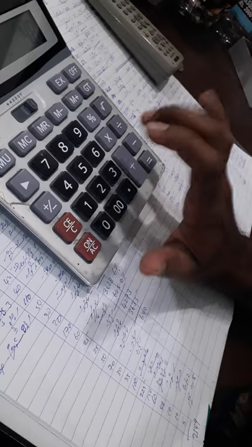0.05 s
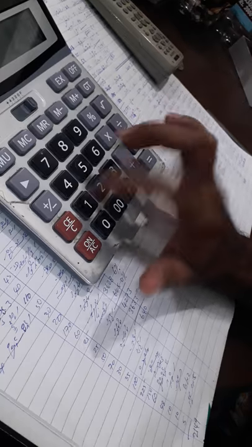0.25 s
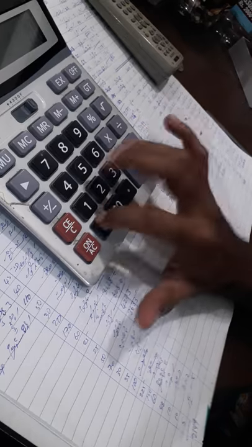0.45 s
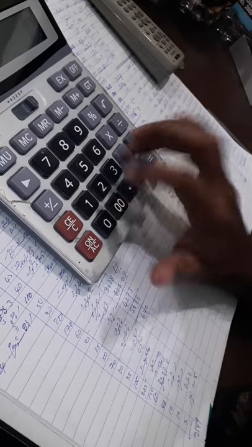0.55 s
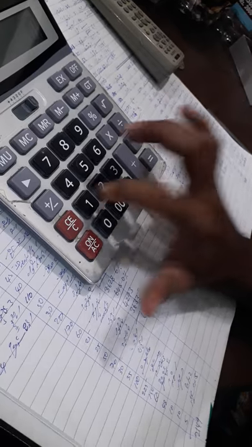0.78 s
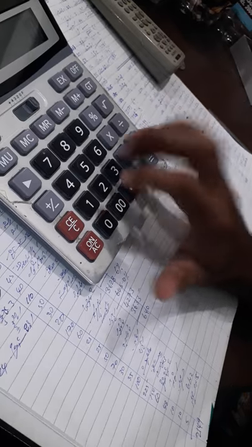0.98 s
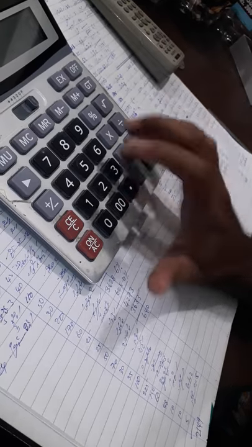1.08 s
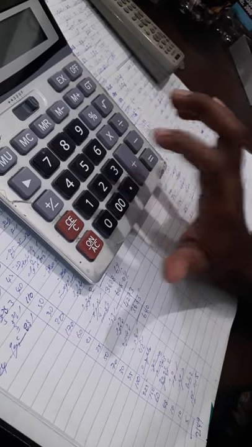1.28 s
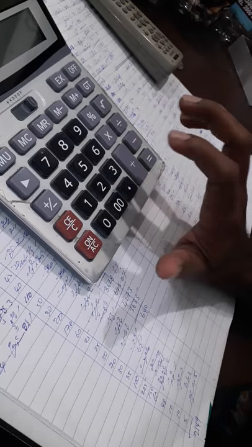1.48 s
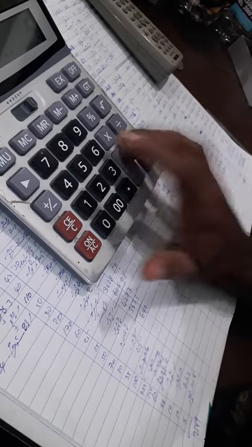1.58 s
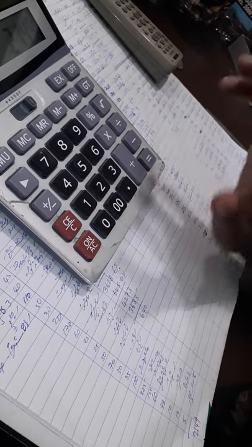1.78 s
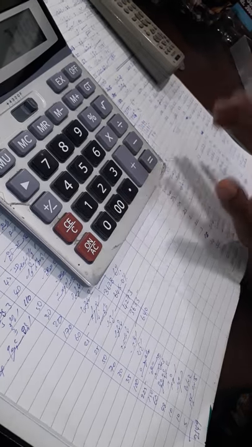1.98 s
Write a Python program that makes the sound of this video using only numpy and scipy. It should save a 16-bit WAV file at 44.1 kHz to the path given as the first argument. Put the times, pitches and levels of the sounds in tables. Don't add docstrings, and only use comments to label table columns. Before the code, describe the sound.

Close stereo phone pickup of fast calculator typing: dry bright clicks with small thumps of the case on a paper-covered desk, a pause, two last clacks, and a faint humming, fluttering fan behind in a room.

```python
import sys
import numpy as np
from scipy import signal
from scipy.fft import rfft, irfft
from scipy.io import wavfile
from scipy.ndimage import uniform_filter1d

SR = 44100
rng = np.random.default_rng(int(sys.argv[2]) if len(sys.argv) > 2 else 0)


def volts(x):
    e = np.asarray(x, float) / 20
    return 10 ** e


def transcribe(u):
    v = np.clip(np.atleast_2d(u).T, -1, 1)
    q = np.round(v * 32767).astype(np.int16)
    wavfile.write(sys.argv[1], SR, q)


N = 90404

TICK_DB = 11

# start in seconds, cap level in dB, tick level in dB, cap pitch in Hz,
# contact time in seconds.
KEYS = [(0.1402, -18, -29, 2175, 0.00066), (0.2166, -16, -25.5, 2640, 0.00038),
        (0.3148, -20, -32, 2366, 0.00219), (.374, -39, -27, 2075, .0012),
        (0.4536, -30, -33.5, 2036, 0.00089), (0.459, -22.5, -31, 2359, 0.00038),
        (0.491, -28, -50, 1984, 0.00042), (.512, -28, -45, 2300, 0.00081), (.527, -23, -25, 2380, 0.00076),
        (0.603, -12.5, -27, 2360, 0.00041), (0.6803, -11, -18, 2520, 0.00071),
        (0.744, -22.5, -34, 2465, 0.0017), (0.7974, -14.5, -25, 2350, 0.00053),
        (0.8794, -18.5, -21, 2360, 0.00065), (0.9162, -26.5, -44, 2427, 0.00097),
        (0.9508, -19.5, -25, 2330, 0.00096), (1.031, -13, -20.5, 2290, 0.0005),
        (1.0655, -29, -44.5, 2020, .0006), (1.105, -20, -31, 2253, 0.00051),
        (1.1745, -19, -24.5, 2450, 0.00069), (1.2284, -27, -21.5, 2460, 0.00125),
        (1.6139, -6, -18.5, 2550, 0.00039), (1.6729, -11, -19, 2540, 0.00044)]
# ratio to the cap pitch, level in dB, 60 dB decay time in seconds.
CAP_MODES = [(1.0, 5.5, 0.0082), (1.09, -16.5, 0.0089)]
BOUNCE_S, BOUNCE_DB = 0.0038, -12
CAP_DB = -1.5
SWELL_EARLY = 0.6
SCRAPE_EXTRA_S = 0.00069


def presses(body, ticks):
    for start_s, cap_db, tick_db, hz, contact_s in KEYS:
        grit = rng.standard_normal((3, 700))
        for late_s, less_db in ((-SWELL_EARLY * contact_s, 0), (BOUNCE_S, BOUNCE_DB)):
            add(body, start_s + late_s, rung(CAP_MODES, hz, contact_s, cap_db + CAP_DB + less_db))
            tick = scrape(grit, SCRAPE_EXTRA_S + contact_s, tick_db + TICK_DB + less_db)
            add(ticks, start_s + late_s, tick)


# start in seconds, level in dB, length in seconds.
TOUCHES = [(0.147, -52, 0.0048), (0.213, -51, 0.0014), (0.311, -35, 0.0043), (0.377, -34, 0.0038),
           (0.6, -38, 0.00163), (0.879, -29.5, 0.0039), (0.936, -35.5, 0.0041), (0.944, -50, 0.00144),
           (1.029, -35, 0.0014), (1.164, -49, 0.0044), (1.171, -37, 0.00298), (1.217, -36, 0.00533),
           (1.6106, -35, 0.0055), (1.633, -45, 0.006), (1.646, -38, 0.0061)]
TOUCH_CAP_HZ, TOUCH_CAP_DB = 2113, 5


def touches(body, ticks):
    for start_s, db, length_s in TOUCHES:
        grit = rng.standard_normal((3, 700))
        add(ticks, start_s, scrape(grit, length_s / 2, db + TICK_DB))
        add(body, start_s, rung(CAP_MODES, TOUCH_CAP_HZ, length_s / 2, db + TOUCH_CAP_DB))


# start in seconds, case level in dB, clack level in dB,
# case pitch ratio.
THUMPS = [(.1415, -19.5, -11.5, 0.96), (.219, -38, -29, 1.2), (.318, -31.5, -47.5, 0.87),
          (.379, -38, -25.5, 1.1), (.461, -30.5, -47, 0.91), (.491, -39, -31, 1.2),
          (.531, -35.5, -32, 1.33), (.603, -19, -16.5, 0.99), (.684, -23.5, -21.5, 0.881),
          (.748, -27, -25, 0.92), (.800, -34, -43, 0.94), (.885, -30.5, -49, 0.86), (.953, -34.5, -25, .9),
          (1.032, -17, -17, 1.02), (1.109, -33, -44, 1), (1.176, -24, -49, 1.043), (1.229, -29, -52, 1.06),
          (1.6152, -17, -23, 1.03), (1.677, -32, -57, 1.1)]
# frequency in Hz, level in dB, 60 dB decay time in seconds.
CASE_MODES = [(614, -6.5, 0.12), (796.4, 11, 0.032), (919, -2, 0.034)]
CASE_CONTACT_S = 0.00079
CLACK_EARLY_S, CLACK_DB = 0.001006, -5


def thumps(body):
    for start_s, case_db, clack_db, ratio in THUMPS:
        thump = rung(CASE_MODES, ratio, CASE_CONTACT_S, case_db, rough=0, length=64)
        add(body, start_s - CASE_CONTACT_S, thump)
        add(body, start_s - CLACK_EARLY_S, clack(clack_db + CLACK_DB))


# frequency in Hz, level in dB, 60 dB decay time in seconds.
CLACK_MODES = [(1110, -23, 0.016), (1450, -17, 0.026), (1750, 38, 0.026)]
SCATTER_DB, DETUNE = 2.5, 0.01


def clack(db):
    t = np.arange(2048) / SR
    ring = np.zeros(len(t))
    for hz, mode_db, t60_s in CLACK_MODES:
        gain = volts(mode_db + SCATTER_DB * rng.standard_normal())
        pitch = hz * 0.89 * (1 + DETUNE * rng.standard_normal())
        ring += gain * decay(t, t60_s) * np.sin(2 * np.pi * pitch * t)
    push = contact(np.ones(64), 0.0001)
    return peak(signal.fftconvolve(ring, push)[:len(t)], db)


# frequency in Hz, density in dB per Hz.
TICK_SPECTRUM = [(1500, -34), (3800, 2), (4900, -2.5), (5700, 1), (7000, -2), (8600, 5), (11000, -2),
                 (15500, -12.5)]


def keys():
    body, ticks = np.zeros(N + SR), np.zeros((2, N + SR))
    presses(body, ticks)
    touches(body, ticks)
    thumps(body)
    body = signal.sosfilt(signal.butter(4, 520, "high", fs=SR, output="sos"), body[:N])
    return body + irfft(rfft(ticks[:, :N]) * volts(curve(TICK_SPECTRUM)), N)


# start in seconds, low mode level in dB,
# middle mode level in dB, middle mode frequency in Hz, high mode level in dB.
PLATE = [(0.1398, -20, -18.5, 2870, -27.5), (0.2174, -20.5, -24, 3000, -30),
         (0.3158, -22, -20.5, 2913, -34), (.374, -30, -28, 2800, -40), (0.4547, -22.5, -30, 2820, -48.5),
         (.527, -26, -26.5, 2850, -39), (.602, -20, -20.5, 2933, -30), (0.6803, -21.5, -17.5, 3066, -18.5),
         (0.743, -22.5, -34, 2900, -40), (0.7968, -21, -29, 2770, -45), (.8797, -18.5, -27, 2830, -33.5),
         (0.9501, -23, -23.5, 2700, -42), (1.031, -12, -24.5, 2820, -24), (1.105, -29, -34.5, 2770, -47.5),
         (1.1739, -15.5, -13.5, 2920, -30.5), (1.2284, -25.5, -21.5, 2880, -35),
         (1.6140, -17.5, -9.5, 3250, -16.5), (1.6735, -25.5, -23, 3050, -43.5)]
PLATE_CONTACT_S = 0.00029
PLATE_LOW_HZ, PLATE_LOW_T60_S = 2030, 0.014
PLATE_MID_T60_S = 0.0072
PLATE_HIGH_HZ, PLATE_HIGH_T60_S = 3800, 0.009
# start in seconds, frequency in Hz, level in dB.
PINGS = [(0.139, 1604, -24), (0.217, 3244, -29), (.329, 1880, -29), (.49, 1940, -27.5), (0.603, 1527, -19),
         (0.679, 4630, -32), (.88, 5630, -22), (.952, 5720, -28), (0.956, 1400, -30), (1.031, 1526, -19),
         (1.033, 3280, -27), (1.106, 4630, -42), (1.167, 3000, -31), (1.175, 5180, -20.5),
         (1.182, 2000, -31), (1.187, 1980, -27), (1.2315, 2170, -26.5), (1.6142, 1510, -15),
         (1.615, 4775, -32), (1.617, 3990, -26), (1.624, 1346, -28), (1.626, 2383, -29), (1.672, 5300, -25),
         (1.679, 2120, -28), (.143, 2230, -16.5), (.314, 2380, -25), (.8826, 2410, -16), (.9545, 2330, -20),
         (1.111, 2260, -34), (1.621, 2530, -24), (1.65, 2500, -36)]
PING_T60_S = 0.018


def plate():
    out = np.zeros(N + SR)
    for start_s, low_db, mid_db, mid_hz, high_db in PLATE:
        modes = (
            (PLATE_LOW_HZ, low_db, PLATE_LOW_T60_S),
            (mid_hz, mid_db, PLATE_MID_T60_S),
            (PLATE_HIGH_HZ, high_db, PLATE_HIGH_T60_S),
        )
        for hz, db, t60_s in modes:
            add(out, start_s, rung([(hz, 0, t60_s)], 0.943, PLATE_CONTACT_S, db))
    for start_s, hz, db in PINGS:
        add(out, start_s, rung([(hz, 0, PING_T60_S)], 0.95, PLATE_CONTACT_S, db))
    return out[:N]


PUSH_ROUGH, PHASE_SCATTER = 1, 0.12


def rung(modes, scale, contact_s, db, rough=PUSH_ROUGH, length=684):
    t = np.arange(2048) / SR
    push = contact(1 + rough * rng.standard_normal(length), contact_s)
    ring = np.zeros(len(t))
    for hz, mode_db, t60_s in modes:
        swell = signal.fftconvolve(decay(t, t60_s), push)[:len(t)]
        cycles = hz * scale * (t - contact_s) + PHASE_SCATTER * rng.standard_normal()
        ring += volts(mode_db) * swell * np.cos(2 * np.pi * cycles)
    return peak(ring, db)


GRIT = 1.5
TICK_LIKENESS = 0.28


def scrape(chance, contact_s, db):
    grit = np.sign(chance) * np.abs(chance) ** GRIT
    pair = TICK_LIKENESS * grit[0] + (1 - TICK_LIKENESS) * grit[1:]
    return peak(contact(pair, contact_s), db)


def contact(noise, contact_s):
    t = np.arange(noise.shape[-1]) / SR / np.clip(contact_s, 1e-4, 0.004)
    return noise * t ** 2 * np.exp(-2 * t)


def decay(t, t60_s):
    return np.exp(-np.log(1000) * t / t60_s)


# frequency in Hz, left minus right level in dB.
PORTS = [(300, 14), (800, 2.5), (1500, 3), (2400, -11), (3500, -5), (5500, -3.5), (8500, -0.5),
         (12500, -5.5)]
# frequency in Hz, lag of the right port in radians.
PORT_LAG = [(500, 0.091), (1000, 0.2), (1600, 1.76), (2400, 1.94), (3500, 6.61), (6000, 10.8),
            (10000, 16.94), (16000, 23.6)]


def ports(x):
    half_db = curve(PORTS) / 2
    left = volts(half_db)
    right = volts(-half_db) * np.exp(-1j * curve(PORT_LAG))
    return irfft(rfft(x * np.ones((2, 1))) * np.array([left, right]), N)


DESK_DB, DESK_T60_S, DESK_TOP_HZ = -12, 0.071, 4840


def desk(x):
    t = np.arange(SR // 8) / SR
    tail = rng.standard_normal((2, len(t))) * decay(t, DESK_T60_S)
    tail /= np.sqrt((tail ** 2).sum(axis=1, keepdims=True))
    tail = signal.lfilter(*signal.butter(1, DESK_TOP_HZ, fs=SR), tail)
    return signal.fftconvolve(x, tail, axes=1)[:, :N] * volts(DESK_DB)


# time in seconds, level in dB.
KNOCKS = [(.023, -10), (.067, -15), (.111, -12), (.155, -16), (.199, 7.5), (.243, -10), (.287, -22),
          (.418, 4), (.506, 1.5), (.550, -8), (.594, -28.5), (.638, 5.5), (.726, 5), (.991, -3), (1.125, 3),
          (1.300, 1.5), (1.386, 3.5), (1.473, 2), (1.519, -0.5), (1.561, 3), (1.737, -5), (1.781, 2),
          (1.825, 3), (1.869, 1), (1.913, -1.5), (2.000, 1.5)]
# frequency in Hz, width in Hz, level in dB.
CAGE = [(2070, 290, -10), (2300, 460, -2.5), (2887, 650, 0), (3080, 550, -10.5), (3497, 170, -11)]
CAGE_RING = 0.15
TURN_HZ, FIRST_TURN_S = 22.76, 0.0233
RATTLE_DB, RATTLE_RISE_S, RATTLE_FALL_S = -43.5, 0.001, 0.022
RATTLE_SCATTER_DB = 1.5
WHINE_HZ, WHINE_WIDTH_HZ, WHINE_DB, WHINE_STEADY = 1927.2, 51, -49.5, 1.56


def rattle():
    turns = (np.arange(N) / SR - FIRST_TURN_S) * TURN_HZ + 1
    size_db = RATTLE_SCATTER_DB * rng.standard_normal(60)
    for time_s, db in KNOCKS:
        size_db[int(round((time_s - FIRST_TURN_S) * TURN_HZ + 1))] = db
    since_s = turns % 1 / TURN_HZ
    shake = (1 - np.exp(-since_s / RATTLE_RISE_S)) * np.exp(-since_s / RATTLE_FALL_S)
    shake = shake * volts(size_db[turns.astype(int)])

    noise = rng.standard_normal((2, len(CAGE), N)) * (shake + CAGE_RING)
    noise[1] = 0.27 * noise[0] + 0.96 * noise[1]
    cage = np.zeros((2, N))
    for k, (hz, width_hz, db) in enumerate(CAGE):
        ring = band(band(noise[:, k], hz, width_hz), hz, 2 * width_hz)
        cage += volts(db) * np.sqrt(200 / width_hz) * ring

    whine = rng.standard_normal(N) * (shake + WHINE_STEADY)
    whine = band(band(whine, WHINE_HZ, WHINE_WIDTH_HZ), WHINE_HZ, 2 * WHINE_WIDTH_HZ)
    return level(ports(cage), RATTLE_DB) + level(ports(whine), WHINE_DB)


# centre in seconds, length in seconds, level in dB, frequency in Hz.
PUFFS = [(.01, 0.0477, -39.5, 81), (0.116, 0.159, -40, 100), (0.149, 0.0152, -30, 102.8),
         (0.224, 0.015, -30, 94.2), (0.274, .03, -37, 70), (0.324, 0.052, -56, 60.4),
         (.47, 0.029, -40, 101), (0.89, 0.013, -52, 114), (1.092, 0.028, -40.5, 108),
         (1.427, 0.096, -42.5, 120), (1.473, 0.013, -31.5, 93.3), (1.56, 0.22, -41, 99.16),
         (1.651, 0.0183, -32.5, 110), (1.689, 0.0075, -25, 105), (1.724, 0.019, -30, 79.6),
         (1.778, 0.03, -41.5, 79), (0.097, 0.029, -46.5, 62.2), (.255, 0.073, -41, 61),
         (1.18, 0.0216, -39, 68.2), (1.978, 0.0485, -45.5, 79.3)]
PUFF_LEFT_DB, PUFF_RIGHT_DB = 6.5, -10
PUFF_WOBBLE = 0.15


def puffs():
    t = np.arange(N) / SR
    wavering_s = np.cumsum(1 + PUFF_WOBBLE * np.array([walk(60), walk(77)]), axis=1) / SR
    low = np.zeros((2, N))
    for centre_s, length_s, db, hz in PUFFS:
        swell = np.exp(-((t - centre_s) / length_s * 2) ** 2)
        low += volts(db) * swell * np.sin(2 * np.pi * hz * wavering_s)
    return low * volts(np.array([[PUFF_LEFT_DB], [PUFF_RIGHT_DB]]))


# frequency in Hz, density in dB per Hz.
AIR_LEFT = [(30, -1.5), (100, -0.5), (300, -6.5), (800, -10.5), (3300, -18.5), (5500, -34), (8600, -31),
            (15000, -46)]
AIR_RIGHT = [(30, -46), (100, -2.5), (300, -5.5), (800, -10.5), (3000, -13), (5500, -29), (9800, -24.5),
             (15000, -44)]
# frequency in Hz, likeness from 0 to 1.
LIKENESS = [(60, 0.78), (300, 0.89), (800, 0.38), (2000, 0), (6000, 0)]
AIR_DB, FLICKER_DB = -41.5, 1
HUM_HZ, HUM_WIDTH_HZ, HUM_DB = 97.9, 23.4, -52


def air():
    like = np.clip(curve(LIKENESS), 0, 1)
    shared, left, right = (flicker() for _ in range(3))
    pair = []
    for own, spectrum in ((left, AIR_LEFT), (right, AIR_RIGHT)):
        mixed = np.sqrt(like) * shared + np.sqrt(1 - like) * own
        pair.append(irfft(mixed * volts(curve(spectrum)), N))
    hum = rng.standard_normal(N)
    for _ in range(2):
        hum = band(hum, HUM_HZ, HUM_WIDTH_HZ)
    return level(np.array(pair), AIR_DB) + level(hum, HUM_DB)


def flicker():
    return rfft(rng.standard_normal(N) * volts(FLICKER_DB * walk(8.61)))


def walk(rate_hz):
    k = int(SR / rate_hz)
    steps = np.repeat(rng.standard_normal(N // k + 1), k)
    return 1.3 * uniform_filter1d(uniform_filter1d(steps, k), k)[:N]


def band(x, hz, width_hz):
    return signal.lfilter(*signal.iirpeak(hz, hz / width_hz, SR), x)


def curve(table):
    bins_hz = np.maximum(np.arange(N // 2 + 1) * SR / N, 1)
    hz, value = np.array(table).T
    return np.interp(np.log(bins_hz), np.log(hz), value)


def level(x, db):
    return x * volts(db) / np.sqrt(np.mean(x ** 2))


def peak(y, db):
    return y * volts(db) / np.abs(y).max()


def add(out, start_s, y):
    i = int(start_s * SR)
    out[..., i:i + y.shape[-1]] += y


def scene():
    near = ports(keys() + plate())
    fan = rattle() + puffs() + air()
    return near + desk(near) + fan


def roll_off(x):
    return signal.sosfilt(signal.butter(12, 16960, fs=SR, output="sos"), x)


def record(dry):
    mix = np.clip(dry, -0.94, 0.94)
    mix = signal.sosfilt(signal.ellip(8, 0.2, 60, 15700, fs=SR, output="sos"), mix)
    mix = signal.sosfilt(signal.butter(4, 42, "high", fs=SR, output="sos"), mix)
    return roll_off(mix)


dry = scene()
out = record(dry)
transcribe(out)
```